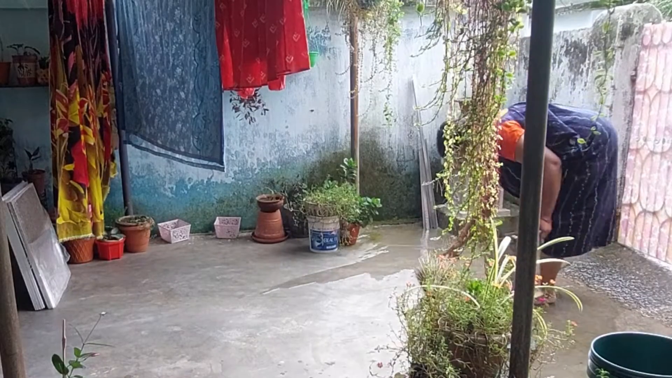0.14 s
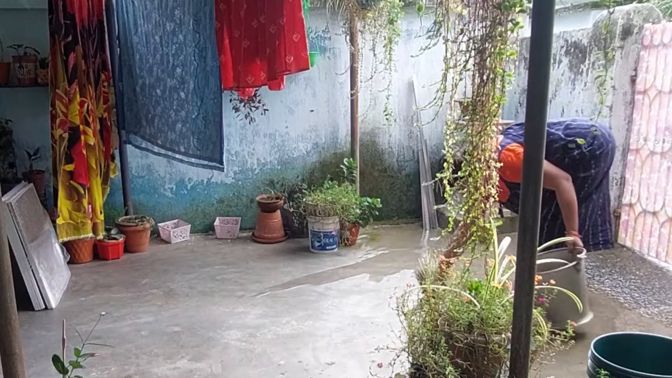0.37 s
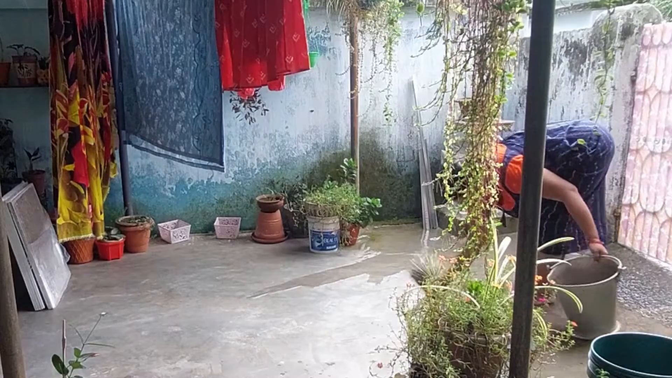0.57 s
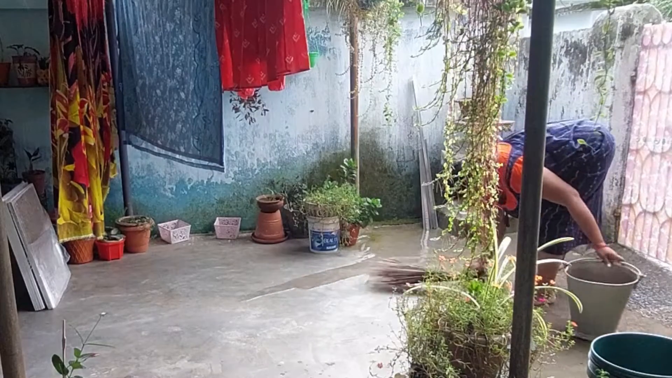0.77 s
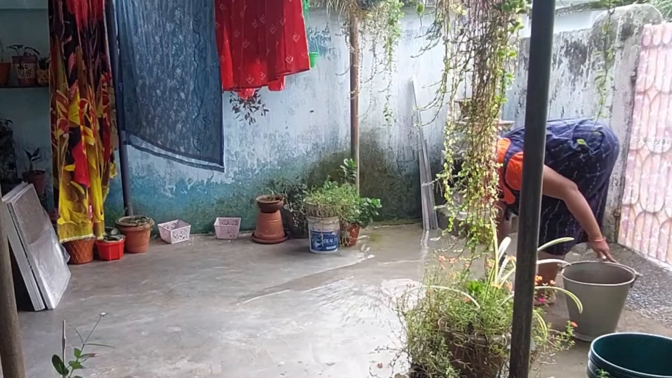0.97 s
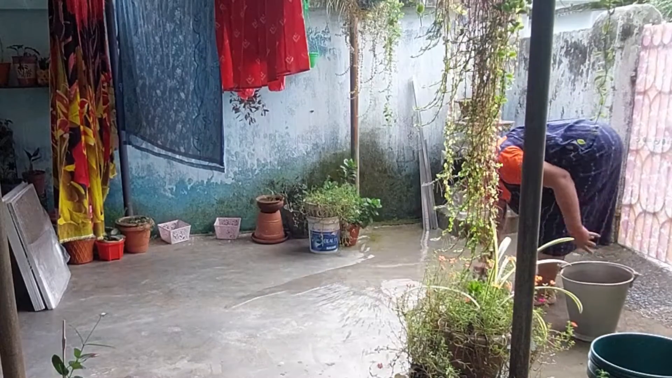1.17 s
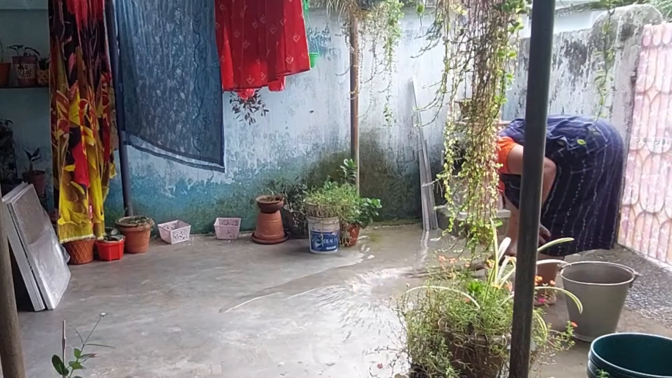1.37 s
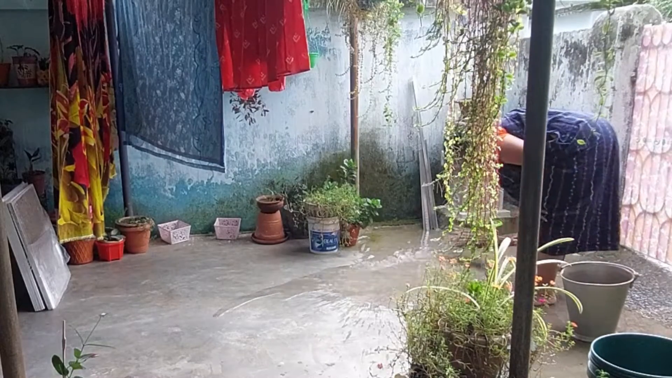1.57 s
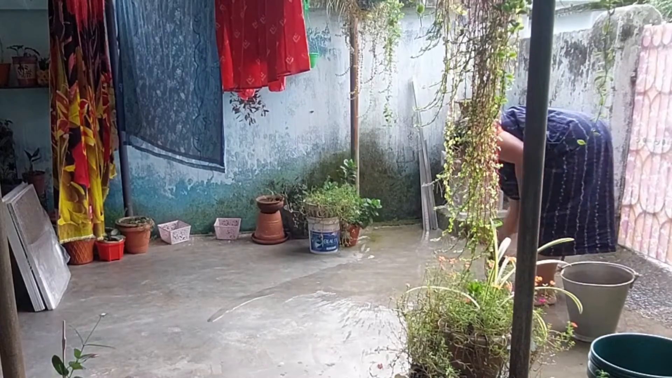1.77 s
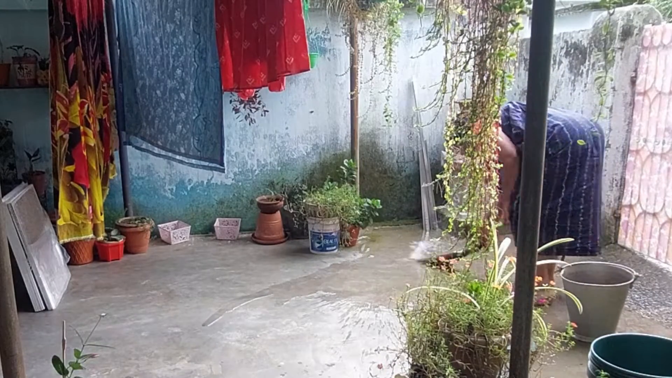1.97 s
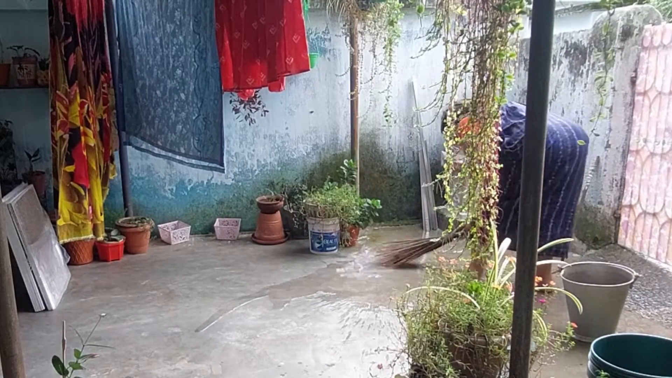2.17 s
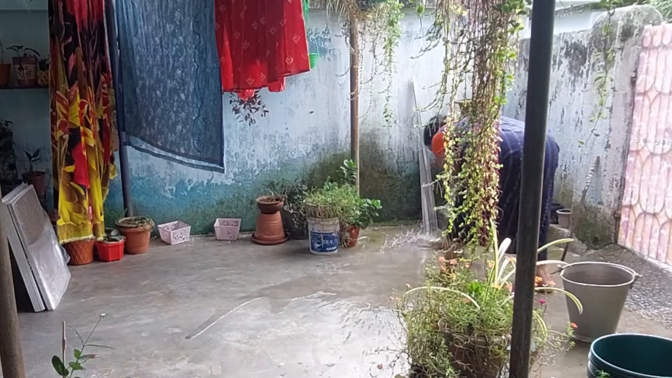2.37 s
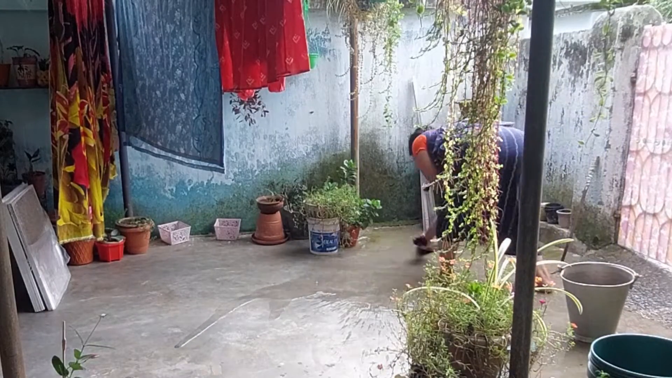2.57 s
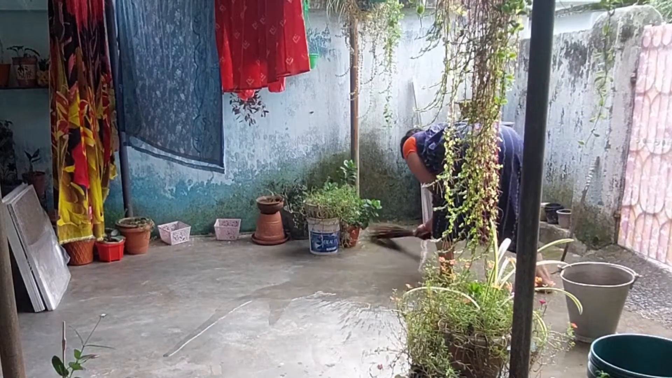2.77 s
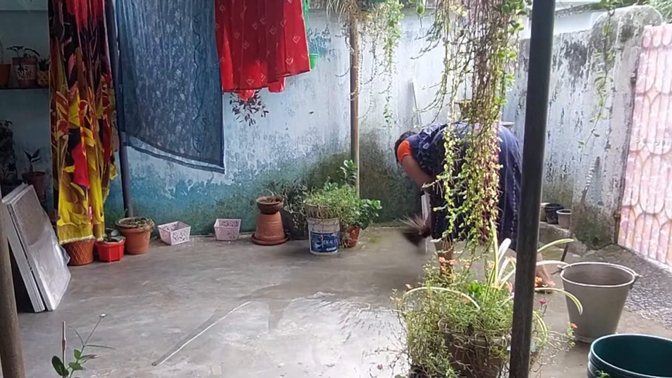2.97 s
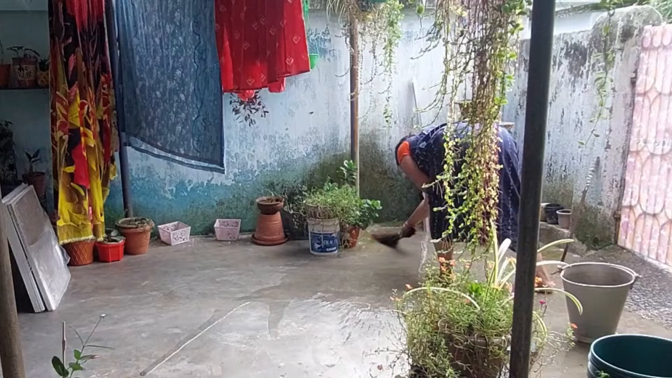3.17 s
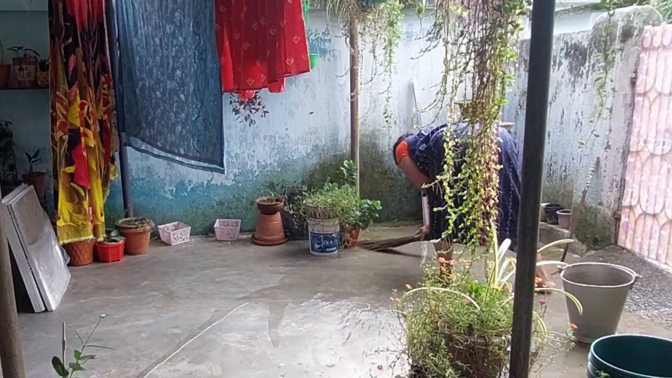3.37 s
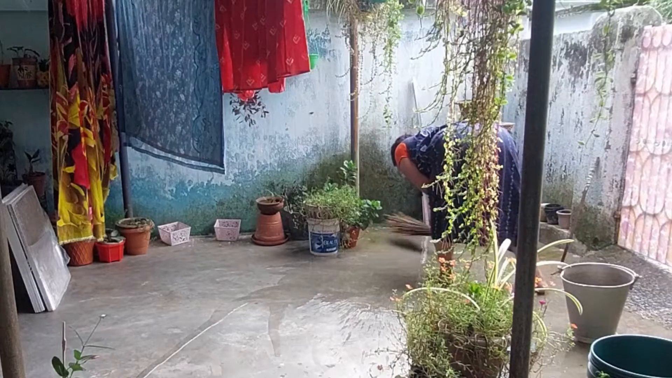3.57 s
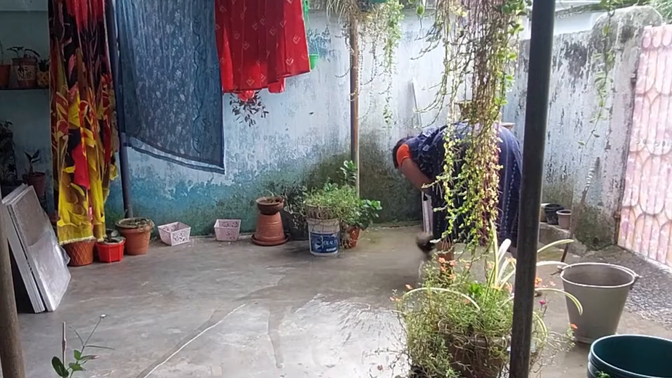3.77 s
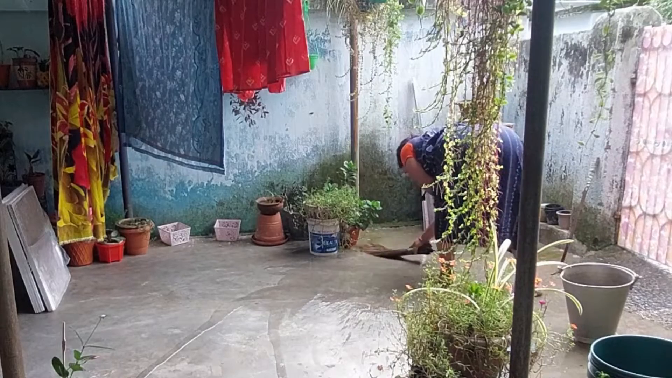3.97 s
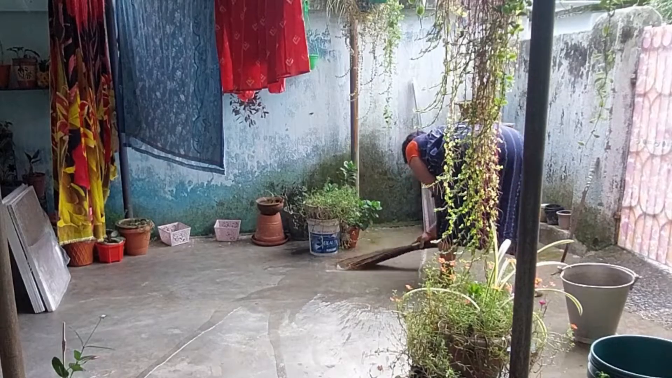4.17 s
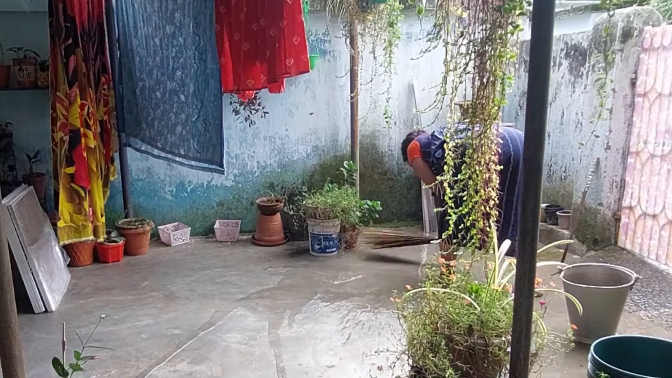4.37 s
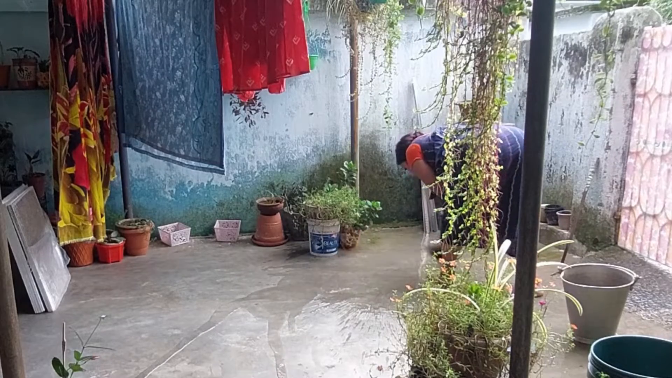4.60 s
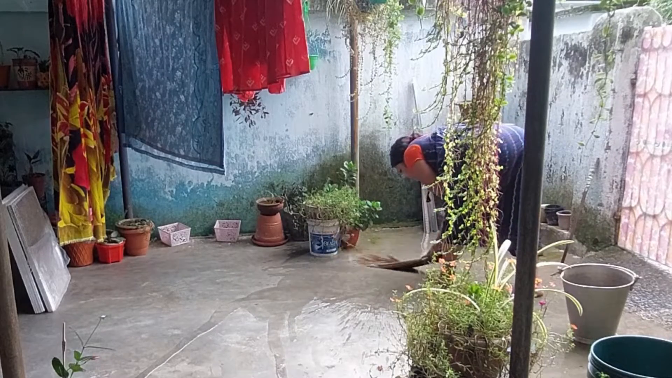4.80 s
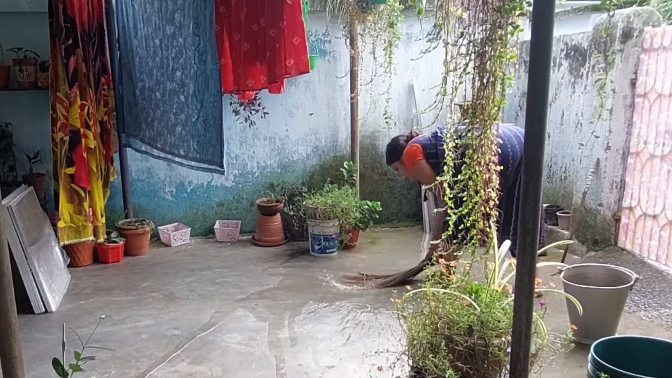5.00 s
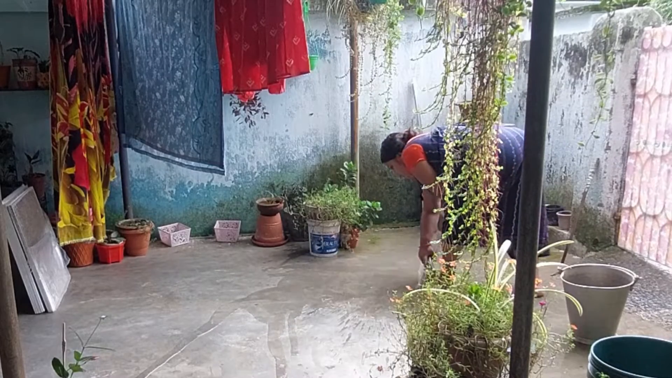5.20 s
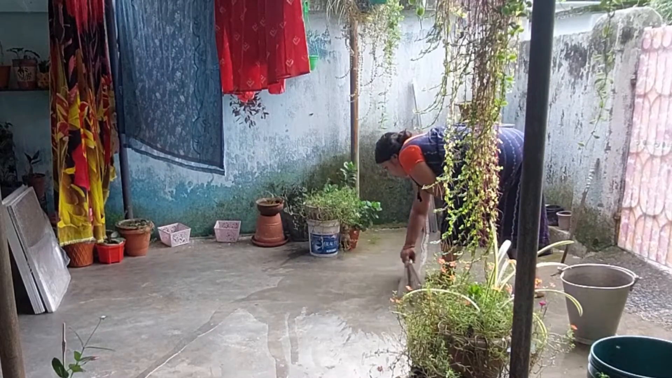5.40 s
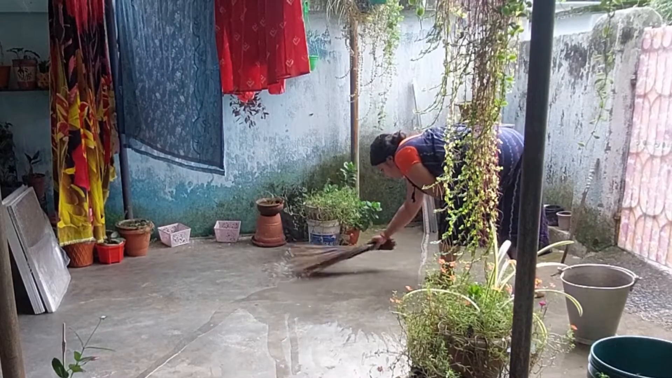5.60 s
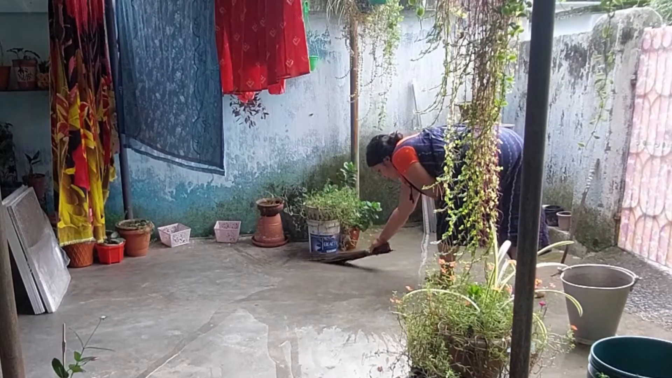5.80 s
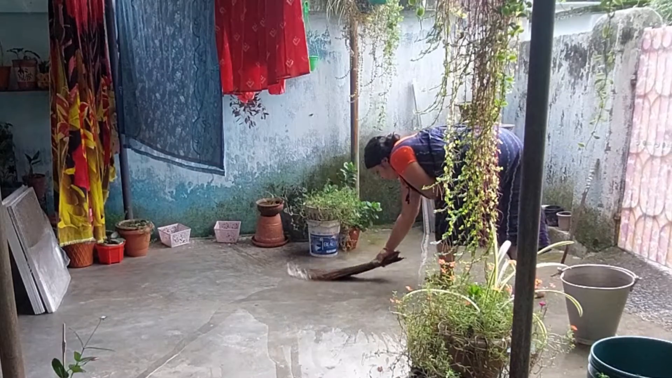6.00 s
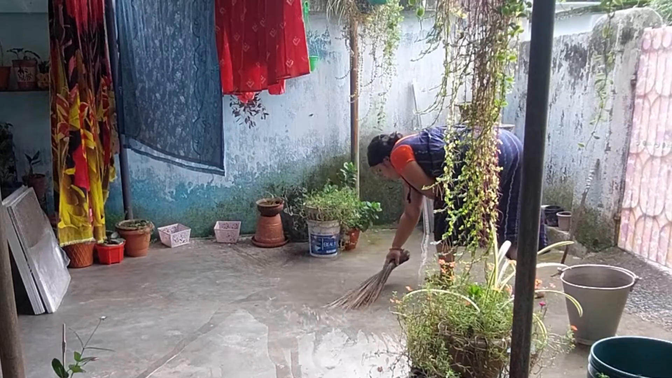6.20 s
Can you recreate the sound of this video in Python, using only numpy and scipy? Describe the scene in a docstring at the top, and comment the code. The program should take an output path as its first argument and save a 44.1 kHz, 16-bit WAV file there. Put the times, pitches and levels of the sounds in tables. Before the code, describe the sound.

A sharp plastic bucket knock opens the scene, followed by a small rub and a burst of deep gulping, churning water as a broom is dunked. From about a second and a half, gritty wet broom strokes take over, rasping and spraying across concrete, some long, some short. Short reflections from courtyard walls surround them. Low distant rumble continues, with a few tiny chirps and a weak wavering squeal near the end.

```python
"""A wet stick broom scrubs concrete in quick strokes: clicking grains make its rasping sticks and spraying tips.
Before most of the scrubbing a plastic bucket is knocked and rubbed, its wall ringing in dying modes,
and the broom is dunked and stirred in it: falling gulps, a low boom, churning and splashing grains.
Shaped noise makes a low town rumble and hiss; wavering sines make a few faint chirps and a thin far squeal.
Sparse reflections put all but the town within the walls of a small courtyard."""
import sys
import numpy as np
from scipy import signal
from scipy.fft import rfft, irfft
from scipy.io import wavfile
from scipy.ndimage import uniform_filter1d

SR = 44100
rng = np.random.default_rng(int(sys.argv[2]) if len(sys.argv) > 2 else 0)


def pcm_store(signal):
    """Save signal as 16-bit PCM."""
    levels = np.round(np.clip(np.atleast_2d(signal), -1, 1) * 32767)
    wavfile.write(sys.argv[1], SR, levels.astype(np.int16).T)


N = 275625
TIME = np.arange(N) / SR
SHORT = np.arange(SR // 2) / SR  # time within a half-second event


def amp(db):
    """Decibels to gain."""
    return 10 ** (np.asarray(db) / 20)


def unit(x):
    """Scales to rms 1."""
    return x / np.sqrt(np.mean(x ** 2) + 1e-20)


def read(points, hz):
    """Reads a table on a log-frequency axis."""
    f, value = np.transpose(points)
    return np.interp(np.log(hz + 1), np.log(f + 1), value)


def colour(x, spectrum, tilt=0):
    """Gives x a spectrum, tilted in dB per octave, at rms 1."""
    hz = np.fft.rfftfreq(x.shape[-1], 1 / SR)
    octaves = np.log2(hz / 1000 + 0.072)  # the offset limits the tilt in the deep bass
    gain = amp(read(spectrum, hz) + tilt * octaves)
    return unit(irfft(rfft(x) * gain, x.shape[-1]))


def add(mix, s, sound):
    """Mixes a sound in at time s, trimming what falls outside the mix."""
    start = round(s * SR)
    sound = sound[..., max(-start, 0):]
    part = mix[..., max(start, 0):][..., :sound.shape[-1]]
    part += sound[..., :part.shape[-1]]


def wander(rate_hz):
    """Slow random drift of rms 1: noise rolled off steeply above rate_hz."""
    hz = np.fft.rfftfreq(N, 1 / SR)
    lowpass = 1 / (1 + (hz / rate_hz) ** 4)
    return unit(irfft(rfft(rng.standard_normal(N)) * lowpass, N))


def grains(per_s, spread_db, size=N):
    """Three unrelated trains of tiny clicks, a few of them large."""
    sizes = amp(spread_db * np.minimum(rng.exponential(1, (3, size)), 5))
    signs = rng.choice([-1, 1], (3, size))
    hits = rng.random((3, size)) < per_s / SR
    return unit(sizes * signs * hits)


def ports(x, direct):
    """The first train comes straight from the right, late at the left port; the other two are scattered."""
    direct = np.clip(direct, 0, 1)
    straight = np.array([np.roll(x[0], 4), x[0]])  # 4 samples late on the left
    return np.sqrt(direct) * straight + np.sqrt(1 - direct) * x[1:]


# One rise before and one fall after its hold, a swell is this far down [dB]; its flanks bow by this power.
EDGE_DB, EDGE_CURVE = -24, 1.204


def swell(s, rise, hold, fall):
    """A gain that rises to 1 at time s, holds and falls away; a negative hold keeps the peak below 1."""
    before = np.maximum(s - TIME, 0) / rise
    after = np.maximum(TIME - s - hold, 0) / fall
    return amp(EDGE_DB * np.minimum(before + after, 10) ** EDGE_CURVE)


def ringing(modes, tilt=0):
    """Half a second of dying modes, each reaching the two ports a little out of step."""
    hz, db, t60 = np.array(modes).T[:, :, None]
    phase = np.minimum(hz / 1200, 2) * rng.standard_normal((2, *hz.shape))  # more out of step higher up
    signs = (-1) ** np.arange(len(hz))[:, None]
    weight = amp(db + tilt * np.log2(hz / 1000)) * signs
    decay = np.exp(-np.log(1000) * SHORT / t60)
    tones = weight * decay * np.sin(2 * np.pi * hz * SHORT + phase)
    onset = 1 - np.exp(-SHORT / 0.00096)
    return tones.sum(1) / np.linalg.norm(weight) * onset


def patchy(x, depth_db):
    """The colour drifts in random patches as different sticks meet different bits of floor."""
    z = signal.stft(x, nperseg=512, noverlap=384)[2]
    patches = rng.standard_normal(z.shape[1:])
    patches = uniform_filter1d(patches, size=9, axis=0)  # across frequency
    patches = uniform_filter1d(patches, size=22, axis=1)  # across time
    return signal.istft(z * amp(depth_db * unit(patches)), nperseg=512, noverlap=384)[1][:, :N]


# How long the walls ring in each band: (frequency [Hz], t60 [s])
YARD_DECAY = [(100, 0.16), (300, 0.58), (1000, 0.34), (4000, 0.35), (8000, 0.32), (16000, 0.28)]


def courtyard(x):
    """Sparse wall reflections, each band dying at its own speed."""
    taps = rng.choice([-1., 1.], (2, SR)) * (rng.random((2, SR)) < 3000 / SR)
    hz, t, z = signal.stft(taps, SR, nperseg=256)
    decay = amp(-60 * t / read(YARD_DECAY, hz)[:, None])
    onset = np.clip(t / 0.0065, 0, 1)
    tail = signal.istft(z * decay * onset, SR, nperseg=256)[1]
    return signal.fftconvolve(x, tail / np.linalg.norm(tail[0]), axes=1)[:, :N]


# Spectrum of the low rumble: (frequency [Hz], density [dB per Hz])
RUMBLE_SPECTRUM = [(20, -43), (38, -13), (54, -0.5), (66, -4), (80, 2.5), (112, 5.5), (145, 2.5), (175, -5),
                   (240, -9), (320, -14.5), (450, -22.5), (900, -86)]
# Slow rise and fall of the rumble: (time [s], level [dB])
RUMBLE_LEVEL = [(0, -0.5), (1.4, 0), (2.1, 0.5), (3.4, 1), (4.3, 0), (5.25, 1.5), (5.7, -1.5), (6.25, -1)]
# Spectrum of the hiss above it: (frequency [Hz], density [dB per Hz])
HISS_SPECTRUM = [(150, -28), (300, 5), (600, -1.5), (1000, -4), (1700, -3.5), (3900, -14), (7000, -14),
                 (10200, -14), (12000, -16), (15800, -23)]


def town():
    """A fluttering low rumble of noise, nearly mono, under a smooth, wider hiss."""
    swell_db = np.interp(TIME, *np.transpose(RUMBLE_LEVEL)) + 1.0 * wander(12)
    rumble = colour(ports(rng.standard_normal((3, N)), direct=0.98), RUMBLE_SPECTRUM)
    hiss = colour(ports(rng.standard_normal((3, N)), direct=0.19), HISS_SPECTRUM)
    return rumble * amp(-42.5 + swell_db) + amp(-55.5) * hiss


SQUEAL_S, SQUEAL_HOLD_S, SQUEAL_EDGE_S = 5.27, 0.65, 0.079
SQUEAL_HZ, SQUEAL_RISE_HZ_PER_S = 1038, 32  # pitch at SQUEAL_S, and its upward creep
SQUEAL_DB, SQUEAL_GROWTH_DB_PER_S = -64, 11  # level at SQUEAL_S, and its growth


def far_squeal():
    """Two sines at a ratio of 9 to 7 waver together in pitch and creep upward as they grow."""
    since = TIME - SQUEAL_S
    hz = SQUEAL_HZ + SQUEAL_RISE_HZ_PER_S * since
    turns = np.cumsum(hz * (1 + 0.0093 * wander(23.8))) / SR
    lower = np.sin(2 * np.pi * turns)
    upper = amp(-5.5 + 1.5 * wander(25)) * np.sin(2 * np.pi * turns * 9 / 7)
    level_db = SQUEAL_DB + SQUEAL_GROWTH_DB_PER_S * since + 1.7 * wander(16)
    return swell(SQUEAL_S, SQUEAL_EDGE_S, SQUEAL_HOLD_S, SQUEAL_EDGE_S) * amp(level_db) * (lower + upper)


# Trills of small birds: (time [s], level [dB], centre pitch [Hz], length [s])
TRILLS = [(0.52, -66, 2590, 0.046), (0.599, -61, 5160, 0.046), (3.714, -60.5, 5280, 0.091),
          (5.408, -58, 5100, 0.04)]


def chirps():
    """Each trill is a gated sine whose pitch falls afresh 55 times a second, with a little jitter."""
    out = np.zeros(N)
    for s, db, hz, length in TRILLS:
        gate = np.interp(TIME, [s, s + 0.004, s + length, s + length + .01], [0, 1, 1, 0])
        note = ((TIME - s) * 55) % 1  # progress through each falling note
        pitch = hz * (1 + 0.14 * (.5 - note) + 0.0102 * wander(240))
        out += amp(db) * gate * np.sin(2 * np.pi * np.cumsum(pitch) / SR)
    return out


# Pockets of air trapped by each push: (time [s], level [dB], nominal pitch [Hz], boom against the gulp [dB])
AIR_GULPS = [(.661, -12, 346, 0), (0.727, -14.5, 324, -2), (.823, -26, 372, -13), (.853, -21, 360, -2),
             (.996, -16, 315, 0), (1.022, -15, 335, -3), (1.114, -9.5, 423, -9), (1.139, -18, 340, -3),
             (1.178, -21, 340, 0), (1.246, -24.5, 390, -1), (1.303, -17.5, 360, 0), (1.335, -25, 326, 4),
             (1.656, -24.5, 296, -12.5), (1.955, -33.5, 287, -6)]
# Air and water resonating in the bucket: (frequency [Hz], level [dB], t60 [s])
BOOM_MODES = [(238, -7.5, 0.62), (309, 3.5, 0.34), (400.4, -10.5, 0.36), (565, -12.5, 0.19),
              (586, -11, 0.2), (728, -16, 0.2)]


def gulps():
    """Each pocket of trapped air sings a short note that drops and settles, and sets the full bucket booming."""
    out = np.zeros((2, N))
    for s, db, hz, boom_db in AIR_GULPS:
        settling = 0.882 + 0.27 * np.exp(-SHORT / 0.0057)
        turns = np.cumsum(hz * settling) / SR
        envelope = np.exp(-SHORT / 0.0065) * (1 - np.exp(-SHORT / 0.00087))
        gulp = envelope * np.sin(2 * np.pi * turns)
        add(out, s, amp(db) * (gulp + amp(boom_db) * ringing(BOOM_MODES)))
    return out


# The broom plunged into the bucket:
# (time [s], hold [s], fall [s], relative churn level [dB], relative splash level [dB])
BROOM_PLUNGES = [(0.661, 0.031, 0.13, -20.5, -34), (0.839, 0.056, 0.12, -31, -45.5),
                 (0.979, 0.034, 0.1, -16, -30.5), (1.122, 0.024, .1, -20, -39),
                 (1.162, 0.013, 0.26, -26.5, -37.5), (1.296, .04, .17, -25, -42)]
# Spectrum of the churning water: (frequency [Hz], density [dB per Hz])
CHURN_SPECTRUM = [(100, -27), (190, -8.5), (240, -9), (265, -1), (312, 7), (345, -0.5), (390, -13.5),
                  (580, -9.5), (800, -28), (1500, -25), (3000, -84), (8000, -70)]
# Spectrum of the splashing surface: (frequency [Hz], density [dB per Hz])
SPLASH_SPECTRUM = [(300, -34), (900, 5), (2000, -5.5), (3300, -3.5), (4400, 4), (5200, -1), (6100, -3),
                   (7000, -6.5), (9500, -13.5), (11500, -10), (16000, -21)]
PLUNGE_RISE_S, CHURN_LAG_S = 0.014, .022  # the churn below peaks later than the surface splash
ENTRY_DB, ENTRY_FALL_S = -2, 0.011  # extra burst as the sticks break the surface, against the splash


def plunges():
    """Dense grains splash at the surface while sparser, darker grains churn below, summed as power."""
    depths, surface = np.zeros(N), np.zeros(N)
    for s, hold, fall, churn_db, splash_db in BROOM_PLUNGES:
        stir = swell(s + CHURN_LAG_S, PLUNGE_RISE_S + CHURN_LAG_S, hold - CHURN_LAG_S, fall)
        depths += (amp(churn_db) * stir) ** 2
        surface += (amp(splash_db) * swell(s, PLUNGE_RISE_S, hold, fall)) ** 2
        surface += (amp(splash_db + ENTRY_DB) * swell(s, PLUNGE_RISE_S, 0, ENTRY_FALL_S)) ** 2
    churn = colour(ports(grains(700, 1.9), direct=0.81), CHURN_SPECTRUM)
    splash = colour(ports(grains(4000, 0.8), direct=0.13), SPLASH_SPECTRUM)
    return churn * np.sqrt(depths) * amp(-0.5) + splash * np.sqrt(surface) * amp(4.5)


# Knocks on the bucket:
# (time [s], level [dB], rattle decay [s], brightness [dB per octave], wall ring against the crack [dB])
BUCKET_KNOCKS = [(-.01, -32.5, 0.08, 3, 6), (.036, -13, .012, .3, -4), (.0461, -9.5, .009, -.8, -3),
                 (0.057, -24, 0.03, 3, -11), (0.076, -20, 0.035, 3, -17), (0.203, -30.5, 0.033, 1.5, -2),
                 (0.614, -38, 0.018, -1.5, 12.5), (0.663, -33.5, 0.11, -3.5, 7),
                 (0.742, -32, 0.038, 1.5, -1), (0.98, -27, 0.034, 7.5, -14),
                 (1.117, -29.5, 0.033, -4.5, -8), (1.295, -36, 0.071, 4, -10)]
# Modes of the plastic wall: (frequency [Hz], level [dB], t60 [s])
WALL_MODES = [(241, -11, .5), (288, -7, .3), (309, -7, .45), (390, -9, .22), (527, -6, .18), (561, -1, .2),
              (680, -6, .15), (795, 2, .27), (815, -2, .15), (962, -5, .22), (989, -5, .2), (1048, -3, .18),
              (1220, -6, .28), (1250, -9, .18), (1450, -11, .22), (1616, -8, .22), (1696, -9, .2),
              (2003, -12, .22), (2265, -13, .18), (2357, -13, .2)]
# Spectrum of a dry crack: (frequency [Hz], density [dB per Hz])
CRACK_SPECTRUM = [(20, -50), (70, -28), (150, -12), (300, 4.5), (900, 3.5), (2000, -5.5), (4500, -14.5),
                  (6000, -16), (11000, -27.5), (16000, -29)]


def knocks():
    """Each knock is a short rattle of contacts that cracks and rings the plastic wall."""
    out = np.zeros((2, N))
    for s, db, length, bright, ring_db in BUCKET_KNOCKS:
        contacts = ports(grains(3000, 2.5, size=len(SHORT)), direct=0.37)
        crack = colour(contacts, CRACK_SPECTRUM, tilt=bright) * np.exp(-SHORT / length)
        add(out, s, amp(db) * (crack + amp(ring_db) * ringing(WALL_MODES, tilt=bright)))
    return out


# Rubs of rim and handle: (time [s], level [dB], rise [s], length [s], wall ring against the slips [dB])
BUCKET_RUBS = [(0.281, -31, 0.053, 0.1, 0), (.614, -29.5, .004, 0.029, 7), (.68, -34, .01, 0.06, -3)]
# Spectrum of the stick-slip drive: (frequency [Hz], density [dB per Hz])
SLIP_SPECTRUM = [(200, 6), (560, -1.5), (780, -0.5), (1000, -3.5), (1235, 2.5), (1500, -8), (2000, -5.5),
                 (2500, -13), (3500, -16.5), (16000, -42)]


def rubs():
    """Stick-slip grains keep the wall's modes singing, shortened by the hand that damps them."""
    out = np.zeros((2, N))
    for s, db, rise, length, ring_db in BUCKET_RUBS:
        slips = colour(ports(grains(790, 3.9, size=len(SHORT)), direct=0.54), SLIP_SPECTRUM)
        held = ringing(WALL_MODES) * np.exp(-SHORT / 0.098)  # the hand damps the wall
        song = unit(signal.fftconvolve(slips, held, axes=1)[:, :len(SHORT)])
        push = (1 - np.exp(-SHORT / rise)) * np.exp(-(SHORT / length) ** 2)
        add(out, s, amp(db) * push * (amp(ring_db) * song + slips))
    return out


def bucket():
    """Knocks and rubs, thinned below 122 Hz because the small wall radiates little bass."""
    bass_cut = signal.butter(2, 122, "highpass", fs=SR, output="sos")
    return signal.sosfilt(bass_cut, knocks() + rubs())


# The broom landing on the wet floor: (time [s], level [dB], decay [s])
FLOOR_SLAPS = [(1.858, -74, 0.074), (3.173, -47, 0.3), (4.113, -42.5, 0.1), (5.93, -39, 0.11)]


def slaps():
    """Each landing is a bright burst of contact grains that dies away."""
    out = np.zeros((2, N))
    for s, db, length in FLOOR_SLAPS:
        envelope = (1 - np.exp(-SHORT / 0.0025)) * np.exp(-SHORT / length)
        contacts = ports(grains(3000, 1.8, size=len(SHORT)), direct=0.65)
        add(out, s, amp(db) * envelope * colour(contacts, CRACK_SPECTRUM, tilt=5.4))
    return out


# Broom strokes: (time at full speed [s], rise [s], hold [s], fall [s],
# relative level of the spraying tips [dB], relative rasp of the sticks against the tips [dB])
BROOM_STROKES = [(1.224, .05, .01, 0.18, -41.5, 0.5), (1.363, 0.18, 0.12, .2, -38.5, 0.5),
                 (1.51, 0.084, 0.038, .15, -35.5, 0.5), (1.873, 0.038, 0.015, 0.065, -38.5, -11),
                 (2.079, 0.27, 0.035, 0.24, -33.5, -4), (2.326, 0.055, .02, .1, -57.5, 6),
                 (2.456, 0.1, 0.024, .13, -37, -3), (2.569, 0.081, 0.018, .13, -43.5, 1),
                 (2.783, 0.21, 0.12, 0.11, -39.5, -2.5), (3.149, 0.013, 0.044, 0.24, -42.5, 4),
                 (3.393, 0.2, 0.043, 0.2, -34.5, -4.5), (3.83, 0.03, 0.018, 0.28, -43, -1),
                 (4.139, 0.29, 0.03, 0.24, -36.5, 0.5), (4.282, 0.14, 0.065, 0.091, -41.5, -3.5),
                 (4.707, .12, 0.038, 0.11, -44, -11), (4.864, 0.13, 0.26, 0.26, -35.5, -7.5),
                 (5.196, 0.13, 0.057, 0.34, -37, -10.5), (5.544, 0.065, 0.055, 0.13, -39.5, -15),
                 (5.663, 0.16, .04, 0.11, -37.5, -21), (5.94, .02, 0.044, 0.076, -41.5, -3),
                 (6.18, 0.24, 0.076, .1, -35.5, -8.5)]
# Spectrum of the tips gliding lightly: (frequency [Hz], density [dB per Hz])
SPRAY_SPECTRUM = [(400, -26), (900, -13), (1500, -13), (2200, -7), (3300, -4.5), (4700, 1), (6000, -3.5),
                  (7700, 1), (9000, -3.5), (10500, -2), (12200, 0.5), (14000, -3), (15800, -4)]
# Spectrum of the sticks pressed down: (frequency [Hz], density [dB per Hz])
RASP_SPECTRUM = [(300, -34), (600, -21.5), (1200, -14.5), (1700, -2.5), (2400, 1.5), (4300, 2), (6000, -2),
                 (9000, -28), (16000, -34)]
PRESS_LAG_S = 0.021  # the tips touch first, the sticks bend and rasp a moment later
DRAG_FROM_S, DRAG_DB = 1.5, -65  # from here wet sticks trail faintly under the strokes (relative level)


def broom():
    """Sticks catch on grit and their tips flick water, as grains; the bundle judders as it slides."""
    tips = np.zeros(N)
    sticks = (amp(DRAG_DB) * swell(DRAG_FROM_S, rise=.2, hold=N / SR, fall=.2)) ** 2
    for s, rise, hold, fall, db, rasp_db in BROOM_STROKES:
        tips += (amp(db) * swell(s, rise, hold, fall)) ** 2
        press = swell(s + PRESS_LAG_S, rise, hold - PRESS_LAG_S, fall)
        sticks += (amp(db + rasp_db) * press) ** 2
    spray = colour(ports(grains(14000, 2.1), direct=0.097), SPRAY_SPECTRUM) * np.sqrt(tips) * amp(4.5)
    rasp = colour(ports(grains(5000, 1.5), direct=0.083), RASP_SPECTRUM) * np.sqrt(sticks) * amp(1.5)
    judder = amp(0.55 * wander(29))
    return patchy(spray + rasp, depth_db=1.5) * judder + slaps()


def scene():
    """Everything sits a little to the right; all but the town also echoes between the walls."""
    far = np.tile(chirps() + far_squeal(), (2, 1))
    dunk = gulps() + plunges()
    clatter = bucket()
    strokes = broom()
    wet = courtyard(amp(-10.0) * strokes + amp(-7.0) * clatter + amp(-15) * dunk + amp(5) * far)
    balance = amp([[-1.1], [.9]])  # left, right
    return (strokes + clatter + dunk + far + wet + town()) * balance


def record(dry):
    """A steep band limit at 15.9 kHz."""
    lowpass = signal.firwin(511, 15900, window=("kaiser", 9), fs=SR)
    return signal.oaconvolve(dry, lowpass[None], "same")


dry = scene()
out = record(dry)
pcm_store(out)
```